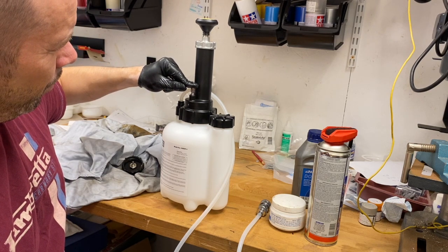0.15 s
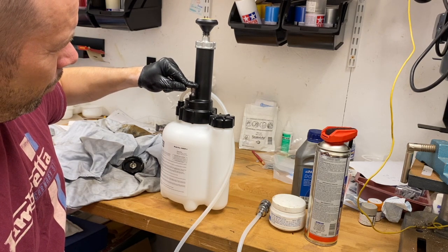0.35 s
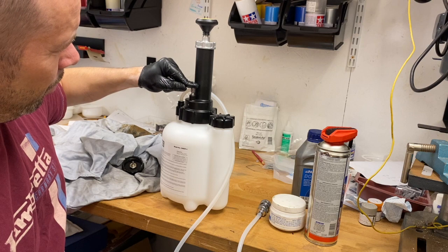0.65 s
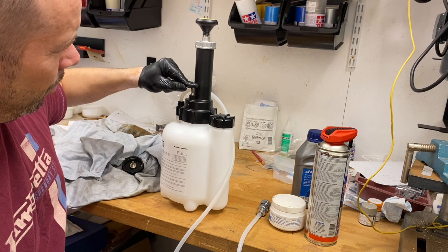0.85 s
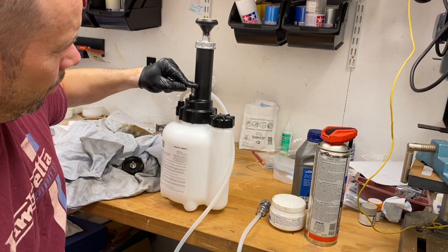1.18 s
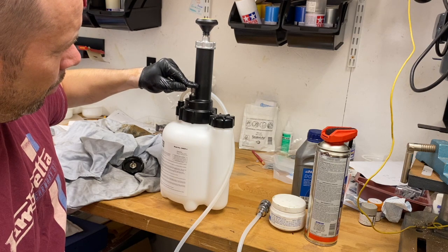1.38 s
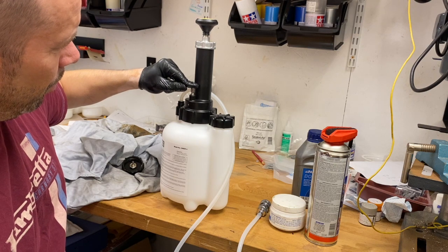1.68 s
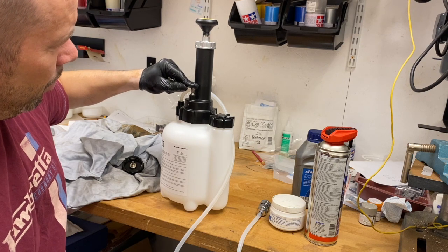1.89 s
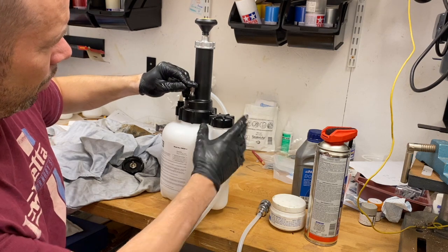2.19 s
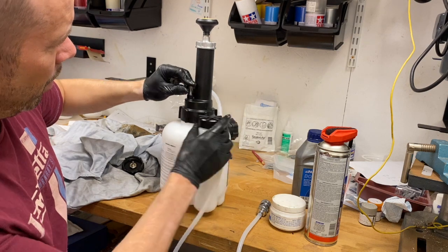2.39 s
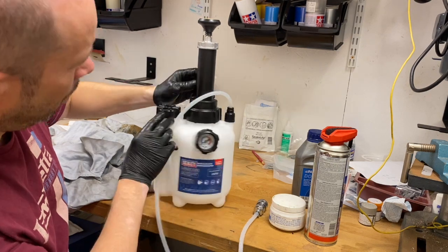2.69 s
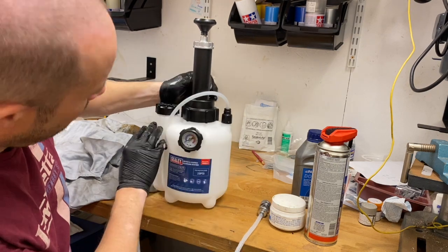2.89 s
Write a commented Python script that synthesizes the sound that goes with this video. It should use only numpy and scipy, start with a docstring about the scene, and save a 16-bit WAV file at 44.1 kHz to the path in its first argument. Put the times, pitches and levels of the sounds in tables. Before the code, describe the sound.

Air hisses from a plastic pressure tank's release valve from the start, bright and steady, slowly weakening over a faint low room rumble. From about 2.2 seconds the tank is turned on a wooden bench: its feet scrape and knock hollowly, loudest around 2.5 to 2.6, and the bench top booms low. The hiss dulls and dies away by 2.85 seconds, leaving a few faint rustles.

```python
"""A turbulent jet of air hisses from the release valve of a plastic pressure tank, weaker as pressure sinks.
A gloved hand turns the tank on a workshop bench: the jet swings away and dies, the feet drag and knock
on the wood, ringing the tank, and the bench top booms in its lowest mode. A low rumble and a faint room
hiss lie under it all; two microphone ports receive the sound with a phase lag between them."""
import sys
import numpy as np
from scipy import signal
from scipy.fft import rfft, irfft, next_fast_len
from scipy.io import wavfile
from scipy.ndimage import uniform_filter1d, map_coordinates

SR = 44100
rng = np.random.default_rng(int(sys.argv[2]) if len(sys.argv) > 2 else 0)


def store_pcm(level_fs):
    """Save levels as 16-bit WAV."""
    pcm = np.round(np.clip(level_fs, -1, 1) * 32767).astype(np.int16)
    wavfile.write(sys.argv[1], SR, np.atleast_2d(pcm).T)


N = 134505


def amp(db):
    return 10 ** (np.asarray(db) / 20)

def unit(x):
    return x / np.sqrt(np.mean(x ** 2) + 1e-20)

def along(points, hz):
    """Interpolation of (Hz, value) points on a log frequency axis."""
    f, v = np.transpose(points)
    return np.interp(np.log(hz + 1), np.log(f + 1), v)

def hump(hz, centre_hz, octaves):
    """A Gaussian pass band on a log frequency axis."""
    return np.exp(-(np.log2((hz + 1) / centre_hz) / octaves) ** 2)

def curves(rows, outside=None):
    """Linear envelopes, one for each column after the time."""
    times, *columns = np.transpose(rows)
    return [np.interp(np.arange(N) / SR, times, column, outside, outside) for column in columns]

def wobble(rate):
    """Smooth random modulation with rate knots a second."""
    return map_coordinates(rng.standard_normal(int(N * rate / SR) + 4), [np.arange(N) * rate / SR])

def filtered(x, response):
    """Linear filtering: the spectrum of x times a complex frequency response."""
    size = next_fast_len(x.shape[-1] + 8192, True)
    return irfft(rfft(x, size) * response(np.fft.rfftfreq(size, 1 / SR)), size)[..., :x.shape[-1]]

def spread(pair, spectrum, coherence):
    """Partial coherence: two independent signals mix to stereo of rms 1, by (Hz, coherence) points."""
    angle = lambda hz: np.arccos(np.clip(along(coherence, hz), -1, 1)) / 2
    mid, side = filtered(pair, lambda hz: amp(along(spectrum, hz)) * [np.cos(angle(hz)), np.sin(angle(hz))])
    return unit(np.array([mid + side, mid - side]))

def patchy(depth_db):
    """Two noises whose gain varies in random patches of time and frequency."""
    spectra = signal.stft(rng.standard_normal((2, N)), nperseg=512)[2]
    field = uniform_filter1d(uniform_filter1d(rng.standard_normal(spectra.shape[1:]), 6, 0), 8, 1)
    return signal.istft(spectra * amp(depth_db * unit(field)), nperseg=512)[1][:, :N]

def add(out, start_s, x):
    """Superposition of x on out from start_s."""
    span = out[:, round(start_s * SR):][:, :x.shape[1]]
    span += x[:, :span.shape[1]]


# Swells of the rumble. Each row: time in seconds, level in dB.
RUMBLE_LEVELS = [(0.0, -62), (0.05, -59.5), (0.2, -58), (0.24, -72), (0.35, -59.5), (0.76, -79),
                 (0.79, -58.5), (1.2, -68), (1.28, -76), (1.31, -65), (1.35, -81), (1.4, -58), (1.5, -76),
                 (1.52, -64), (1.75, -62), (1.79, -53.5), (2.0, -61), (2.02, -68.5), (2.21, -54),
                 (2.25, -69)]
# Spectra of the rumble and the room hiss. Each row: frequency in Hz, relative density in dB.
RUMBLE_SPECTRUM = [(15, -29), (30, -17), (45, 2), (55, 11), (66, 1), (85, -12.5), (120, -42.5),
                   (200, -40.5)]
HISS_SPECTRUM = [(60, -0.5), (120, 4), (250, -7), (500, -8.5), (1100, -28), (2600, -47), (9000, -7.5),
                 (15000, -55)]
RUMBLE_END_DB, HISS_DB = -58.5, -67.5

def background():
    """Ambient noise: an amplitude-modulated rumble and the room's steady hiss."""
    level_db, = curves(list(RUMBLE_LEVELS) + [(RUMBLE_LEVELS[-1][0] + 0.068, RUMBLE_END_DB)])
    rumble = spread(rng.standard_normal((2, N)), RUMBLE_SPECTRUM, [(50, 0.98)])
    rumble /= np.sqrt(uniform_filter1d(np.mean(rumble ** 2, 0), SR // 20) + 0.067)  # evens out its power
    hiss = spread(patchy(depth_db=-5.0), HISS_SPECTRUM, [(100, 0.77), (500, 0.7), (1500, 0.21)])
    return amp(level_db) * rumble * amp([[-.9], [.9]]) + amp(HISS_DB) * hiss


# Decay of the workshop. Each row: frequency in Hz, reverberation time (T60) in seconds.
REVERB_TIMES = [(200, 0.55), (2000, 0.45), (10000, 0.047)]

def reverberation(x):
    """Convolution with a diffuse tail in which each frequency decays exponentially at its own rate."""
    hz, t, spectra = signal.stft(rng.standard_normal((2, SR // 2)), SR, nperseg=256)
    decay = amp(-60 * t / along(REVERB_TIMES, hz)[:, None])
    tail = signal.istft(spectra * decay, SR, nperseg=256)[1]
    delayed = np.pad(x, ((0, 0), (300, 0)))
    return signal.fftconvolve(delayed, tail / np.linalg.norm(tail[0]), axes=1)[:, :N]


# The glove brushing the tank, and faint bright rustles.
# Each row: start in seconds, length in seconds, level in dB, band centre in Hz.
GLOVE_BRUSHES = [(1.87, 0.086, -62.5, 770)]
BRIGHT_RUSTLES = [(2.82, 0.037, -59.5, 8500), (2.93, 0.029, -67, 6300), (2.97, 0.033, -65.5, 8200)]

def swishes(rows, octaves):
    """Band-limited noise bursts with a quick rise and a slower Gaussian fall."""
    out, t = np.zeros((2, N)), np.arange(SR // 5) / SR
    for start, length, db, centre_hz in rows:
        noise = rng.standard_normal(len(t)) + rng.standard_normal((2, len(t)))
        band = unit(filtered(noise, lambda hz: hump(hz, centre_hz, octaves)))
        envelope = (1 - np.exp(-t / length / 0.026)) * np.exp(-(t / length) ** 2)
        add(out, start, amp(db) * band * envelope)
    return out


# Resonances of the tank. Each row: frequency in Hz, bandwidth in Hz, peak gain in dB.
TANK_MODES = [(431, 40, -1), (554, 60, -2), (720, 24, 13), (967, 40, 5), (1440, 70, 0), (1700, 200, 3),
              (2100, 200, 1), (2500, 90, 1), (2780, 200, -4), (3350, 80, 3), (3930, 100, 3),
              (4870, 250, -6)]

def tank_response(hz):
    """Modal superposition: the tank responds as a sum of damped resonators of alternating sign."""
    return sum((-1) ** k * amp(db) * 1j * hz * width / (centre ** 2 - hz ** 2 + 1j * hz * width)
               for k, (centre, width, db) in enumerate(TANK_MODES))


# Fingers tap and the feet catch.
# Each row: start in seconds, gain in dB, band centre in Hz, width in octaves, T60 in seconds.
IMPACTS = [(2.101, -46, 1200, 1.4, 0.023), (2.122, -55, 520, 0.17, 0.09), (2.24, -45, 1240, 0.71, 0.021),
           (2.343, -30, 1670, 0.56, 0.045), (2.345, -45.5, 3830, 0.24, 0.09),
           (2.378, -37.5, 680, 0.32, 0.11), (2.4, -41, 720, .4, .08), (2.434, -42, 970, 0.39, 0.083),
           (2.446, -32, 780, 1.56, 0.08), (2.515, -42, 2200, 0.3, 0.22), (2.54, -26.5, 910, 1.45, 0.042),
           (2.546, -37.5, 200, 0.37, 0.089), (2.57, -40, 1500, 0.73, 0.11), (2.58, -42, 760, 0.49, 0.31),
           (2.5962, -30, 1400, 1.6, 0.08), (2.5962, -27, 3650, 0.3, 0.05),
           (2.603, -33.5, 1900, 0.93, 0.051), (2.612, -33, 1400, 0.33, 0.074),
           (2.728, -47, 1515, 0.093, 0.089)]
RATTLE_RISE_S, DULL_HZ = .0008, 6500
BLOW_TO_RATTLE, TANK_BYPASS = .8, .2  # amplitude ratios

def knocks():
    """Impact excitation: one blow and a dying rattle ring the tank, most strongly in their own band."""
    out, t = np.zeros((2, N)), np.arange(SR // 4) / SR
    grid_hz = np.fft.rfftfreq(8192, 1 / SR)
    body = lambda hz: tank_response(hz) + TANK_BYPASS
    for start, db, centre_hz, octaves, t60 in IMPACTS:
        band = lambda hz: hump(hz, centre_hz, octaves) / (1 + (hz / DULL_HZ) ** 4)
        noise = rng.standard_normal(len(t)) + 0.43 * rng.standard_normal((2, len(t)))
        rattle = amp(-60 * t / t60) * (1 - np.exp(-t / RATTLE_RISE_S)) * filtered(noise, band)
        blow = filtered(1. * (t == 0), band)
        blow *= BLOW_TO_RATTLE * np.linalg.norm(rattle[0]) / np.linalg.norm(blow)
        rms_gain = np.sqrt(np.mean(np.abs(body(grid_hz) * band(grid_hz)) ** 2))
        add(out, start, amp(db) * filtered(rattle + blow, body) / rms_gain)
    return out * amp([[.5], [-.5]])


# Lowest mode of the bench top. Each row: time in seconds, frequency in Hz, level in dB.
BENCH_MODE = [(2.25, 58.1, -80), (2.294, 59.4, -46), (2.338, 66.3, -64), (2.384, 67.3, -32.5),
              (2.404, 69.8, -30.5), (2.444, 72.2, -38), (2.478, 67.7, -28), (2.542, 67.8, -32.5),
              (2.58, 70.45, -45), (2.642, 68.3, -33), (2.716, 68.6, -45.5), (2.778, 68.6, -35.5),
              (2.864, 69.3, -43), (2.904, 68, -90), (2.92, 67.3, -70)]

def bench_boom():
    """Plate vibration: the bench top swings in its lowest mode, a wavering tone with a noisy judder."""
    pitch_hz, _ = curves(BENCH_MODE)
    _, level_db = curves(BENCH_MODE, outside=-120)
    wavering_hz = pitch_hz * (1 + 0.044 * wobble(24.92))
    swing = np.sqrt(2) * np.sin(2 * np.pi * np.cumsum(wavering_hz) / SR)
    judder = amp(-14) * unit(filtered(rng.standard_normal(N), lambda hz: hump(hz, 70, octaves=.5)))
    return filtered(amp(level_db) * (swing + judder), lambda hz: hz < 250) * amp([[-.8], [.8]])


# The feet dragging. Each row: time in seconds, relative rasp level in dB, thud level in dB.
DRAG_LEVELS = [(2.2, -73.5, -102), (2.254, -55, -51), (2.28, -66, -55.5), (2.318, -56.5, -52),
               (2.338, -51.5, -46), (2.366, -48, -37), (2.428, -49, -48.5), (2.456, -48.5, -42),
               (2.522, -43.5, -40.5), (2.544, -43.5, -36.5), (2.624, -41.5, -36.5), (2.674, -51, -46),
               (2.716, -51, -47.5), (2.752, -50, -39), (2.812, -57.5, -50), (2.858, -69.5, -61),
               (2.9, -108, -60.5)]
# Spectra of the scrape and the thud. Each row: frequency in Hz, relative density in dB.
SCRAPE_SPECTRUM = [(250, -10), (420, -8), (550, -3.5), (1000, -6.5), (1600, -4), (2300, -12), (3900, -13.5),
                   (8000, -20.5), (11000, -68)]
THUD_SPECTRUM = [(80, -2.5), (130, -5), (165, -0.5), (190, -1.5), (215, -6.5), (250, -14), (350, -39.5)]
SLIPS_PER_S, SLIP_SPREAD_DB, RING_DB = 9000, 1.24, -5

def dragging_feet():
    """Stick-slip friction: dense slips rasp on the wood and ring the tank, over a low thudding."""
    rasp_db, thud_db = uniform_filter1d(curves(DRAG_LEVELS, outside=-100), size=600)
    slips = (rng.random((2, N)) < SLIPS_PER_S / SR) * rng.standard_normal((2, N))
    slips *= amp(SLIP_SPREAD_DB * rng.exponential(size=(2, N)))
    coherence = [(200, 0.92), (700, 0.44), (1300, 0.43), (8000, 0.16)]
    ring = filtered(slips, lambda hz: tank_response(hz) / (1 + (hz / 2600) ** 6))
    ring = amp(RING_DB + 2.2 * wobble(39)) * spread(ring, [(1, 0)], coherence)
    rasp = unit(spread(slips, SCRAPE_SPECTRUM, coherence) + ring)
    rasp *= amp(rasp_db + 6.5 + 0.58 * wobble(120))
    thud = amp(thud_db) * spread(rng.standard_normal((2, N)), THUD_SPECTRUM, coherence)
    return rasp * amp([[.6], [-.6]]) + thud * amp([[-1.2], [1.2]])


# Echoes from the bench, tank wall and back wall. Each row: delay in milliseconds, gain in dB.
REFLECTIONS = [(1.194, -20.5), (1.526, -23.5), (1.785, -22.2), (2.528, -22.2), (4.234, -19.7),
               (4.81, -23.8), (5.193, -21.3), (5.351, -20.5), (6.235, -21.8), (6.613, -22.7),
               (8.501, -23.0)]
REFLECT_ABOVE_HZ = 6600

def reflection_comb(hz):
    """Comb filtering: treble mirrored by near surfaces interferes with the direct sound."""
    echoes = sum(amp(db) * np.exp(-2j * np.pi * hz * ms / 1000) for ms, db in REFLECTIONS)
    return 1 + echoes / (1 + (REFLECT_ABOVE_HZ / (hz + 1)) ** 8)


# Narrow peaks in the hiss: valve resonances and, near 13-14 kHz, ringing from nearby reflections.
# Each row: frequency in Hz, bandwidth in Hz, added peak in dB re the hiss.
HISS_PEAKS = [(1415, 94, -5.5), (2135, 124, 1.5), (2573, 68, 0), (3075, 50, 0.5), (3457, 54, 0.5),
              (3986, 45, -0.5), (5140, 65, -5), (5420, 58, -2.5), (6420, 39, -4), (7150, 90, -9),
              (7580, 110, -1.5), (10140, 13, -5), (13300, 29, 2.5), (13480, 42, 4), (13500, 50, -1),
              (13880, 35, 2)]

def hiss_peaks(hz):
    """Resonance and interference: narrow Lorentzian peaks stand on a flat response."""
    return 1 + sum(amp(db) / (1 + (2 * (hz - centre) / width) ** 2) for centre, width, db in HISS_PEAKS)


# Course of the jet. Each row: time in seconds, level in dB, extra gain of the top octave in dB.
JET_LEVELS = [(0, -35.5, -2), (.1, -39, 2), (.55, -39, 0), (.8, -38.5, -1), (1.3, -41.5, 1), (2, -43, .5),
              (2.25, -47.5, 5.5), (2.35, -45, -3), (2.42, -47.5, -19), (2.53, -43.5, -11), (2.62, -46, -25),
              (2.75, -50.5, -31), (2.85, -68, -21), (2.9, -64, -3), (3.05, -69, -5)]
# Spectrum of the turbulence. Each row: frequency in Hz, relative density in dB.
JET_SPECTRUM = [(500, -34.5), (1100, -25.5), (1400, -16), (1900, -18), (2400, -14.5), (3500, -10.5),
                (4400, -9.5), (5300, -7), (6600, -10), (8400, -2.5), (10000, 0.5), (11200, -1),
                (13400, -2.5), (14500, -0.5), (15700, -15.5)]
# Likeness of the jet's two channels. Each row: frequency in Hz, coherence from 0 to 1.
JET_COHERENCE = [(500, 0.62), (1400, 0.98), (2500, 1), (4700, 0.12), (6500, 0.2), (7600, 0.13), (8400, 1),
                 (10000, 0.93), (15000, 0.89)]
# Stereo balance of the jet. Each row: frequency in Hz, left minus right level in dB.
JET_PAN = [(60, -5), (99, -20.5), (160, -7), (270, -8.5), (450, 2.5), (740, 3.5), (1220, 0.5), (2010, 0.5),
           (3330, 1.5), (5500, 4.5), (9080, 0), (15000, -1.5)]
TOP_OCTAVE_HZ = 10500

def jet():
    """Turbulent mixing makes broadband hiss; by directivity the top octave beams away first."""
    level_db, top_db = curves(JET_LEVELS)
    balance = lambda hz: amp(np.outer([.5, -.5], along(JET_PAN, hz)))
    turbulence = spread(patchy(depth_db=1.0), JET_SPECTRUM, JET_COHERENCE)
    air = unit(filtered(turbulence, lambda hz: reflection_comb(hz) * hiss_peaks(hz) * balance(hz)))
    top = filtered(air, lambda hz: 1 / (1 + (TOP_OCTAVE_HZ / (hz + 1)) ** 12))
    flutter_db = 0.45 * wobble(3.2) + 0.2 * wobble(60)
    return amp(level_db + flutter_db) * (air + (amp(top_db) - 1) * top)


KNOCK_REVERB_DB, JET_REVERB_DB = -14.5, -10

def scene():
    """Superposition of the direct sounds and the reverberant field of the knocks and the jet."""
    hits, air = knocks(), jet()
    room = reverberation(amp(KNOCK_REVERB_DB) * hits + amp(JET_REVERB_DB) * air)
    turning = hits + dragging_feet() + bench_boom()
    rustling = swishes(GLOVE_BRUSHES, octaves=1.0) + swishes(BRIGHT_RUSTLES, octaves=0.5)
    return background() + room + rustling + turning + air


# Stereo width at the microphone ports. Each row: frequency in Hz, gain of the side signal in dB.
SIDE_GAINS = [(6500, 0), (7800, -12.5), (8400, -4.5), (16000, -47)]
# Phase between the ports. Each row: frequency in Hz, lead of the right port in half cycles.
PORT_PHASES = [(100, 0), (4500, -.5), (6600, 0), (8400, 1), (10050, 2), (11850, 3), (14000, 4), (15650, 5)]
BAND_LIMIT_HZ = 15780

def record(dry):
    """Phase difference at spaced, band-limited ports: treble from one direction reaches one port first."""
    mid = (dry[0] + dry[1]) / 2
    side = filtered((dry[0] - dry[1]) / 2, lambda hz: amp(along(SIDE_GAINS, hz)))
    knots_hz, lead = np.transpose(PORT_PHASES)
    ports = lambda hz: np.exp(np.outer([-.5, .5], 1j * np.pi * np.interp(hz, knots_hz, lead)))
    return filtered(np.array([mid + side, mid - side]), lambda hz: ports(hz) * (hz < BAND_LIMIT_HZ))


dry = scene()
out = record(dry)
store_pcm(out)
```